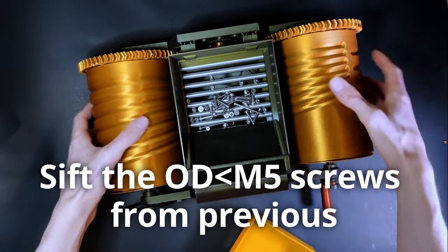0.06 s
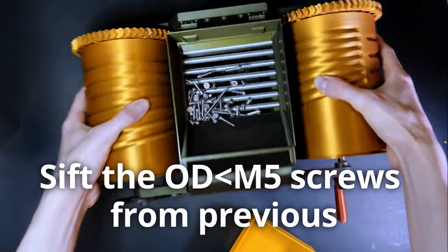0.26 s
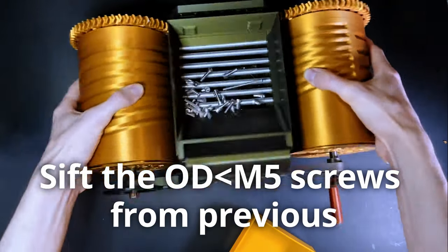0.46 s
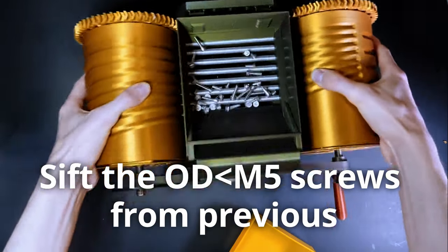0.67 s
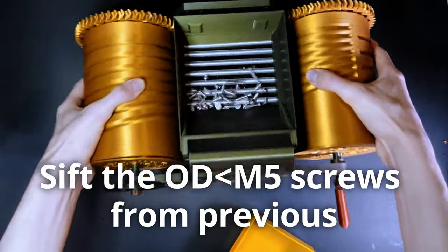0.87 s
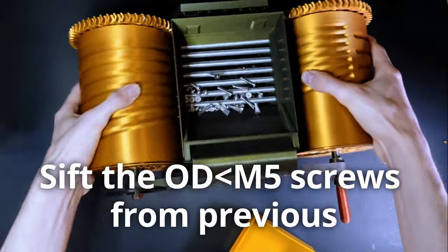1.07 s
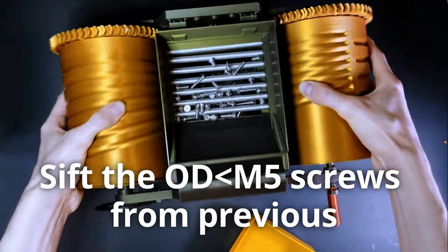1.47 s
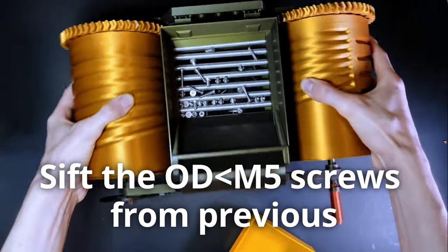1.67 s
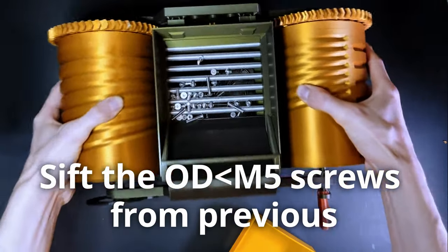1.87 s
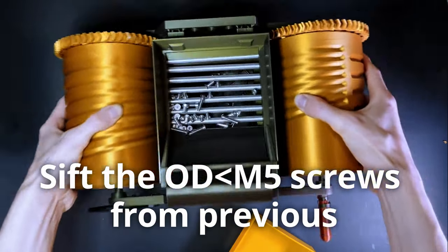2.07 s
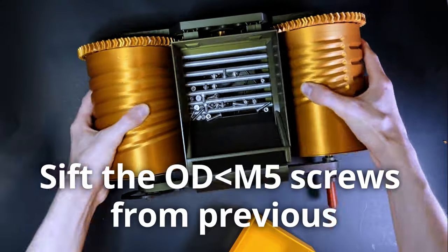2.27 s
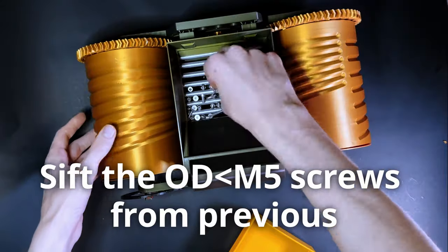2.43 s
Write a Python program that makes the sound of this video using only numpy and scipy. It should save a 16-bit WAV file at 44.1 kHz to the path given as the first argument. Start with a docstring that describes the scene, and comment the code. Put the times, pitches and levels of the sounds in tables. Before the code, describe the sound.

Loose metal screws rattle on the rods of a hand-shaken plastic sieve, close up in a small room. The bright clatter builds by 0.2 seconds, with sharp knocks and dull thuds around 0.2, 0.4 and 0.7. It dips briefly near 1.3, then continues a little lighter, with sliding and separate clinks. The rattling stops at about 2.3 seconds, leaving a few faint ticks near 2.5.

```python
"""Loose steel screws rattle on the parallel rods of a plastic sieve, shaken by hand in a small room. Each jolt
throws the heap against the rods as a swarm of tiny impacts, often about 30 ms apart, with duller sliding in
between. Every impact excites damped modes of the screw and the frame. Now and then screws land hard in a quick
run, a rod rings, and the housing knocks and thuds in the hands."""
import sys
import numpy as np
from scipy import signal
from scipy.fft import rfft, irfft
from scipy.io import wavfile
from scipy.ndimage import uniform_filter1d

SR = 44100
rng = np.random.default_rng(int(sys.argv[2]) if len(sys.argv) > 2 else 0)


def store_pcm(level_fs):
    """Save levels as 16-bit WAV."""
    pcm = np.round(np.clip(level_fs, -1, 1) * 32767).astype(np.int16)
    wavfile.write(sys.argv[1], SR, np.atleast_2d(pcm).T)


N = 110250

# spectrum of a screw's impact on a rod: (frequency [Hz], relative density [dB])
RATTLE_SPECTRUM = [(60,-53),(200,-21),(350,-18),(520,-10),(750,-6),(1300,-6),(1900,-0.5),(3400,2.5),(5500,-0.5),(7700,5),(10800,-3),(13000,-3.5),(15500,2.5)]
# likeness of left and right: (frequency [Hz], correlation [-])
COHERENCE = [(60,0.7),(400,0.62),(1200,0.89),(4500,0.63),(8000,0.05),(15000,0.0494)]


def jolts():
    """Impact noise: the heap strikes the rods in dense swarms of contacts."""
    # landings of the heap: (time [s], level [dB], half length [s])
    throws = [(.128,-54.5,0.0069),(.164,-48,0.0061),(.193,-44,0.015),(.234,-35,0.0076),(.279,-31.5,0.0052),(.313,-27.5,0.0088),(.343,-31,0.018),
              (.398,-31,0.0056),(.43,-32.5,0.017),(.455,-48,0.014),(.484,-32.5,0.012),(.513,-34,0.0051),(.536,-31.5,0.014),
              (.594,-34.5,0.008),(.619,-28.5,0.0094),(.65,-28.5,0.0077),(.683,-33,0.011),(.707,-29.5,0.009),(.736,-31.5,0.012),(.761,-30.5,0.0082),
              (.789,-34.5,0.012),(.824,-33,0.0092),(.848,-31.5,0.0094),(.875,-28.5,0.0078),(.905,-30.5,0.008),(.939,-37.5,0.015),(.961,-33,0.0083),(1.021,-36,0.0094),
              (1.047,-32,0.012),(1.078,-35.5,0.011),(1.111,-34,0.007),(1.136,-39.5,0.011),(1.165,-34.5,0.0093),(1.192,-35.5,0.013),(1.229,-30,0.0094),(1.261,-49,0.019),
              (1.344,-28.5,0.01),(1.429,-37.5,0.016),(1.461,-33,0.013),(1.49,-38,0.0089),(1.513,-37.5,0.015),(1.561,-38.5,0.0061),(1.608,-38,0.0059),
              (1.663,-33,0.013),(1.733,-38.5,0.014),(1.788,-38.5,0.028),(1.811,-36,0.01),(1.839,-35.5,0.013),(1.877,-38,0.0074),(1.9,-40.5,0.0088),
              (1.924,-37.5,0.0084),(1.996,-32,0.0082),(2.086,-40.5,0.0029),(2.113,-35,0.01),(2.137,-33.5,0.006),(2.165,-35.5,0.0073),(2.222,-38,0.0095),(2.246,-41.5,0.0057),
              (2.268,-48.5,0.01),(2.392,-48.5,0.016),(2.47,-45.5,0.018)]
    return contacts(from_db(2) * swells(throws), RATTLE_SPECTRUM, count=17)


def sliding(tilt_db_per_octave=-3):
    """Friction noise: sliding screws make a stream of micro-impacts, duller than landings."""
    # envelope of the sliding: (time [s], level [dB])
    envelope = [(0,-75),(.15,-65),(.22,-41.5),(.95,-43),(1,-49),(1.05,-44),(1.27,-53),(1.29,-66),(1.32,-56),(1.355,-40.5),(1.54,-40.5),(1.7,-43),(1.92,-48.5),(2.261,-45),(2.29,-91),(2.365,-89),(2.43,-56.5),(2.5,-68)]
    level = from_db(np.interp(np.arange(N) / SR, *np.transpose(envelope)) - 2)
    lowest_hz = RATTLE_SPECTRUM[0][0]
    dull = [(hz, db + tilt_db_per_octave * np.log2(hz / lowest_hz)) for hz, db in RATTLE_SPECTRUM]
    return contacts(level, dull, count=11)


def clinks():
    """Contact chatter: a hard landing is a quick run of five touches by different screws, each 1 dB stronger."""
    # hard landings: (time [s], level [dB])
    hits = [(.0703,-47.5),(.2098,-28.5),(1.109,-35),(1.2615,-33),(1.4217,-36),(1.4486,-28.5),(1.5938,-43),(1.6122,-33),(1.6402,-39.5),(1.721,-37.5),
            (1.7699,-32.5),(1.8567,-30),(2.046,-34),(2.0615,-62),(2.299,-65),(2.475,-45.5)]
    # their crack: (frequency [Hz], relative density [dB])
    spectrum = [(200,-37),(1500,-16),(3000,-2),(7500,-0.5),(11000,-12),(15500,-4)]
    return from_db(14) * impact_runs(hits, spectrum, gap_s=0.00046, step_db=1, count=5)


def knocks():
    """Superposition: seven screws hit the housing in quick, weakening succession and fuse into a knock."""
    # slams of the heap: (time [s], level [dB])
    hits = [(.2245,-25),(.3685,-32),(.3768,-24),(.673,-23.5)]
    # their crack: (frequency [Hz], relative density [dB])
    spectrum = [(100,-32),(400,-5),(700,-11.5),(1200,9),(1900,3),(3200,10.5),(7000,4),(11000,-2.5),(15500,5)]
    return from_db(21) * impact_runs(hits, spectrum, gap_s=0.0008, step_db=-2, count=7)


def contacts(level, spectrum, count, rate_hz=2000, active=5, turn_s=.03):
    """Shot noise: random impulses excite `count` screws, which take turns a few at a time."""
    clicks = (rng.random(N) < rate_hz / SR) * rng.choice([-1., 1.], N)
    local_rms = np.sqrt(np.abs(uniform_filter1d(clicks ** 2, 200)) + 1e-6)
    clicks = level * clicks / local_rms
    turn = (np.arange(N) / SR / turn_s).astype(int)
    touching = (turn * active + rng.integers(0, active, N)) % count
    forces = (clicks * (touching == k) for k in range(count))
    return sum(signal.oaconvolve(force[None], screw(spectrum), axes=1)[:, :N] for force in forces)


def impact_runs(hits, spectrum, gap_s, step_db, count):
    """Multiple impact: each hit is a quick run of touches whose level changes in equal steps."""
    out = np.zeros((2, N))
    responses = [screw(spectrum) for _ in range(count)]
    for s, db in hits:
        for k, which in enumerate(rng.permutation(count)):
            onset = s + gap_s * (k + .5 * rng.random())
            add(out, onset, from_db(db + k * step_db) * rng.choice([-1, 1]) * responses[which])
    return out


def screw(spectrum, size=4096, high_modes=3, detune=0.022):
    """Impulse response of a screw on a rod: a crack, high modes, the shank's ping and the frame's ring."""
    # modes of the frame and rods: (frequency [Hz], level [dB], T60 [s])
    frame_modes = [(505.3,-26.5,0.043),(1082,-30.5,0.053),(1305,-19,0.037),(1727,-29,0.064)]
    ring = sum(mode(hz, t60=0.013, size=size) for hz in rng.uniform(6890, 9130, high_modes))
    ring /= np.sqrt(high_modes)
    shank = mode(hz=rng.uniform(1869, 4353), t60=0.053, size=size)  # pitched by its length
    # the frame's pitch depends on where the screws lie
    frame = sum(from_db(db) * mode(hz * (1 + detune * rng.standard_normal()), t60, size)
                for hz, db, t60 in frame_modes)
    return unit(crack(spectrum, size) + from_db(-6) * ring + from_db(-13.5) * shank + frame)


def crack(spectrum, size, t60_at_1khz=.015):
    """Frequency-dependent damping: third-octave bands of noise die away, the treble first."""
    edges_hz = np.geomspace(25, 17000, 29)
    t, out = np.arange(size) / SR, 0
    for low, high in zip(edges_hz, edges_hz[1:]):
        hz = np.sqrt(low * high)
        t60 = t60_at_1khz / np.sqrt(hz / 1000)
        fade = np.exp(-np.minimum(np.log(1000) * t / t60, 30))
        band = signal.butter(2, [low, high], "band", fs=SR, output="sos")
        mid, side = unit(signal.sosfilt(band, rng.standard_normal((2, size)) * fade))
        out = out + from_db(at_hz(spectrum, hz)) * np.sqrt(high - low) * stereo(mid, side, hz)
    return unit(out)


def rods():
    """Free vibration: a struck rod rings out in a single mode."""
    # strikes on a rod: (time [s], level [dB])
    strikes = [(0.955,-40.5),(1.04,-47),(1.143,-42),(1.991,-40.5)]
    out = np.zeros((2, N))
    for s, db in strikes:
        add(out, s, from_db(db) * struck(hz=1318, t60=0.071))
    return out


def clunks(t60=.05, overtone_ratio=1.2):
    """Resonance: the hollow housing sounds a low mode and a weaker overtone."""
    # hollow clunks: (time [s], level [dB], pitch [Hz])
    strikes = [(0.121,-48.5,676),(.674,-40,225),(.709,-35.5,199),(1.395,-53,510),(1.871,-45.5,528),(1.894,-41.5,557),(2.299,-48,510)]
    out = np.zeros((2, N))
    for s, db, hz in strikes:
        ring = struck(hz, t60) + from_db(-10) * struck(hz * overtone_ratio, t60)
        add(out, s, from_db(db) * ring)
    return out


def thuds():
    """Heavy damping: the plastic body gives brief, pitchless swells of low noise."""
    # thuds of the housing: (time [s], level [dB], half length [s])
    events = [(.128,-51.5,0.0064),(.228,-39.5,0.0064),(.322,-39,0.015),(.348,-38.5,0.0063),(.375,-40,0.012),(.425,-49.5,0.02),(.536,-42.5,0.012),(.679,-47.5,0.0068),(.715,-42,0.0063),(2.324,-59.5,0.0097)]
    # their colour: (frequency [Hz], relative density [dB])
    spectrum = [(30,-50),(60,-24),(120,-4),(230,-2),(380,-8.5),(1100,-5.5),(2200,-15),(12000,-45)]
    return swells(events) * steady(spectrum)


def bumps():
    """Soft contact excites only low frequencies: the hands shift their grip."""
    # shifts of grip: (time [s], level [dB], half length [s])
    events = [(.075,-57.5,0.026),(2.325,-57.5,0.013),(2.446,-59,0.016)]
    # their colour: (frequency [Hz], relative density [dB])
    spectrum = [(40,-25),(115,1.5),(180,-7),(400,-23),(2000,-83)]
    return swells(events) * steady(spectrum)


def mode(hz, t60, size):
    """Damped oscillator of energy 1; its phase differs more between the ears where coherence is low."""
    t = np.arange(size) / SR
    phase_spread = np.arccos(at_hz(COHERENCE, hz)) / 2
    ear_phase = phase_spread * rng.standard_normal() * np.array([[1], [-1]])
    return unit(np.sin(2 * np.pi * (hz * t + rng.random()) + ear_phase) * from_db(-60 * t / t60))


def struck(hz, t60, size=8000, attack_s=0.0025):
    """Gradual excitation: a mode builds up softly to a peak of 1."""
    ring = mode(hz, t60, size) * np.minimum(np.arange(size) / SR / attack_s, 1)
    return ring / np.abs(ring).max()


def swells(events, roundness=2.47):
    """Incoherent summation: swells add in power, each 10 dB down a half length from its peak."""
    t, power = np.arange(N) / SR, np.zeros(N)
    for s, db, half in events:
        near = np.abs(t - s) < 4 * half
        power[near] += from_db(db - 10 * np.abs((t[near] - s) / half) ** roundness) ** 2
    return np.sqrt(power)


def steady(spectrum):
    """Spectral shaping: stationary stereo noise, rolled off below 20 Hz, with rms 1."""
    hz = np.maximum(np.arange(N // 2 + 1) * SR / N, 1)
    gain = from_db(at_hz(spectrum, hz)) * hz ** 2 / (hz ** 2 + 20 ** 2)
    mid, side = rfft(rng.standard_normal((2, N))) * gain
    return unit(irfft(stereo(mid, side, hz), N)) * np.sqrt(N)


def stereo(mid, side, hz):
    """Partial coherence: two independent noises mix into correlated left and right channels."""
    alike = at_hz(COHERENCE, hz)
    return np.sqrt(1 + alike) * mid + np.sqrt(1 - alike) * side * [[1], [-1]]


def add(out, s, sound):
    """Superposition of a short stereo sound at time s."""
    start = int(np.clip(s * SR, 0, N - 1))
    out[:, start:start + sound.shape[1]] += sound[:, :N - start]


def from_db(db):
    """Decibels to amplitude ratio."""
    return 10 ** (np.asarray(db) / 20)


def at_hz(points, hz):
    """Interpolation on a log-frequency axis."""
    frequencies, values = np.transpose(points)
    return np.interp(np.log(hz), np.log(frequencies), values)


def unit(x):
    """Normalisation to energy 1 in each channel."""
    return x / np.sqrt(np.sum(x ** 2, axis=-1, keepdims=True) + 1e-20)


def room(x, t60=0.2, dull_hz=3520, size=16000):
    """Reverberation: diffuse reflections form a faint, dull tail that decays exponentially."""
    tail = rng.standard_normal((2, size)) * from_db(-60 * np.arange(size) / SR / t60)
    wet = signal.oaconvolve(x, unit(tail), axes=1)[:, :N]
    return from_db(-11.5) * signal.sosfilt(signal.butter(1, dull_hz, fs=SR, output="sos"), wet)


def air():
    """Ambient noise: the quiet room's steady, low hush."""
    # noise floor: (frequency [Hz], relative density [dB])
    spectrum = [(25,-38),(120,-3.5),(400,-10.5),(15000,-49)]
    return from_db(-72.5) * steady(spectrum)


def scene():
    """The sources superpose; a 1 dB level difference between the ears sets the sieve slightly right."""
    screws = clinks() + jolts() + sliding()
    housing = knocks() + rods() + clunks() + thuds() + bumps()
    sieve = (screws + housing) * from_db([[-0.5], [0.5]])
    return sieve + room(sieve) + air()


def record(dry, cutoff_hz=16000):
    """Band limiting: a steep low-pass removes the highest treble."""
    return signal.sosfilt(signal.ellip(12, .1, 80, cutoff_hz, fs=SR, output="sos"), dry)


dry = scene()
out = record(dry)
store_pcm(out)
```